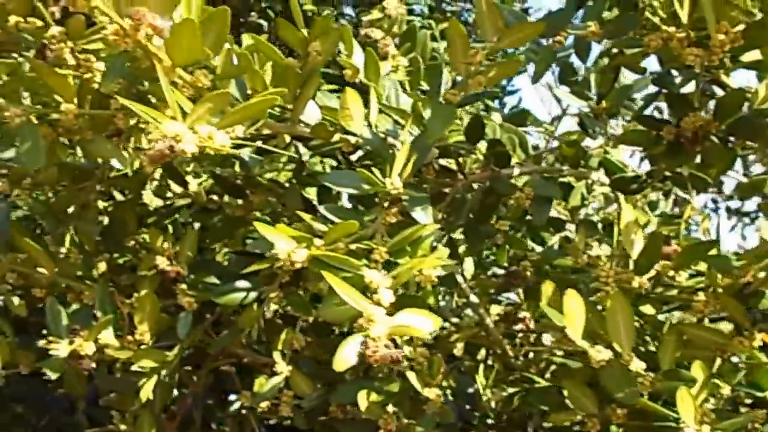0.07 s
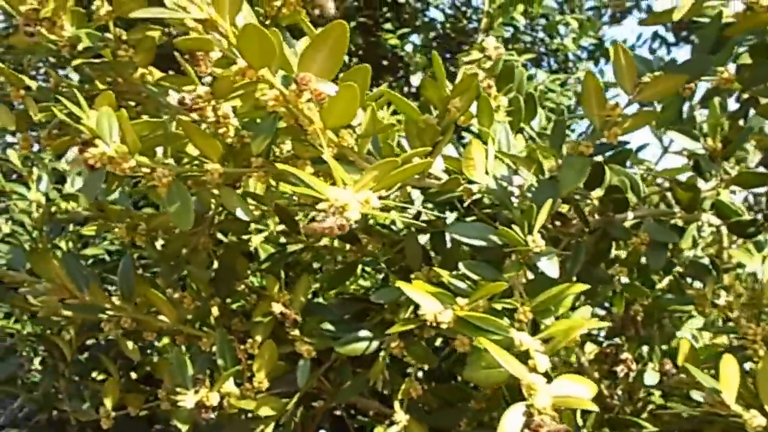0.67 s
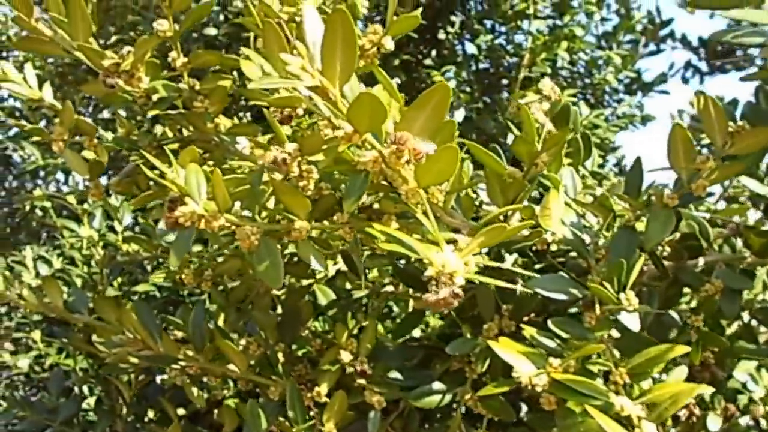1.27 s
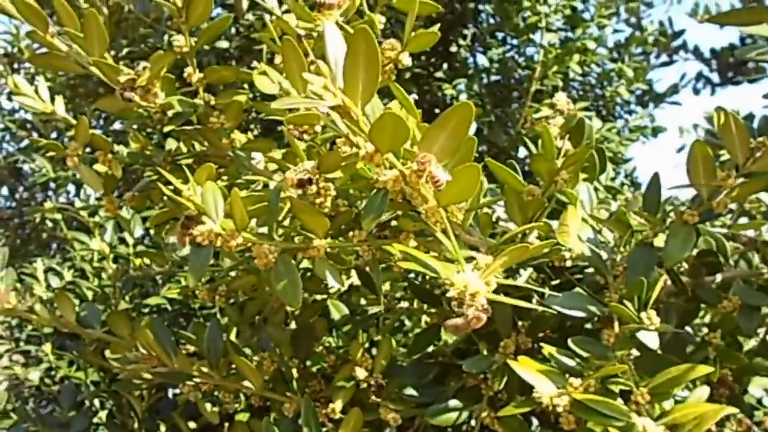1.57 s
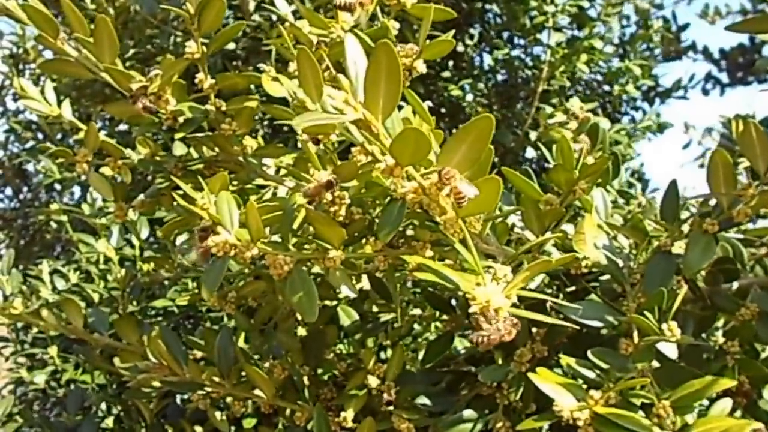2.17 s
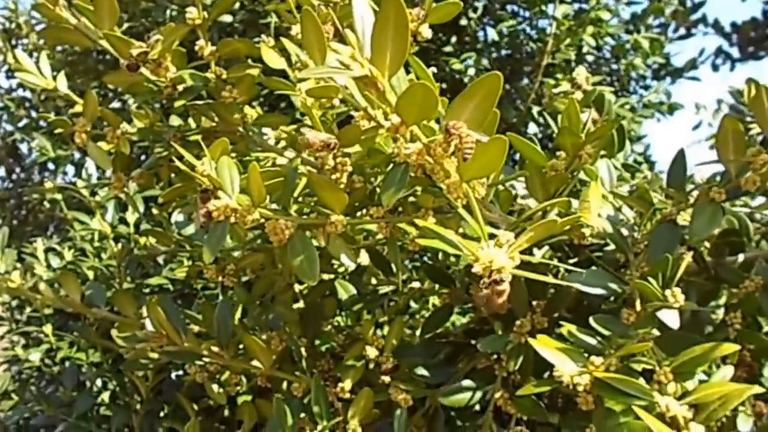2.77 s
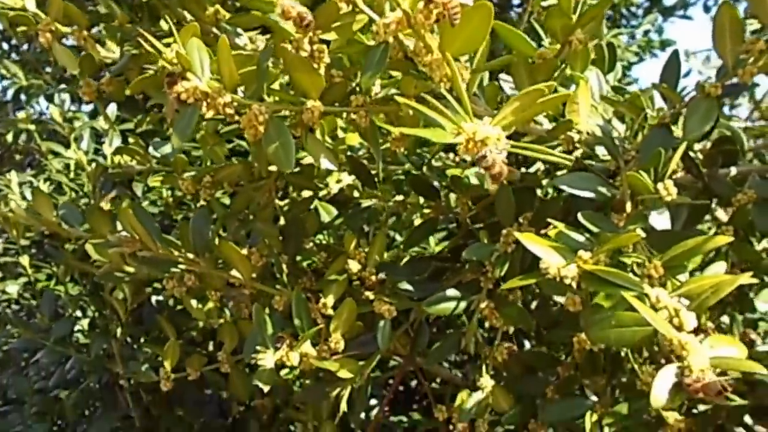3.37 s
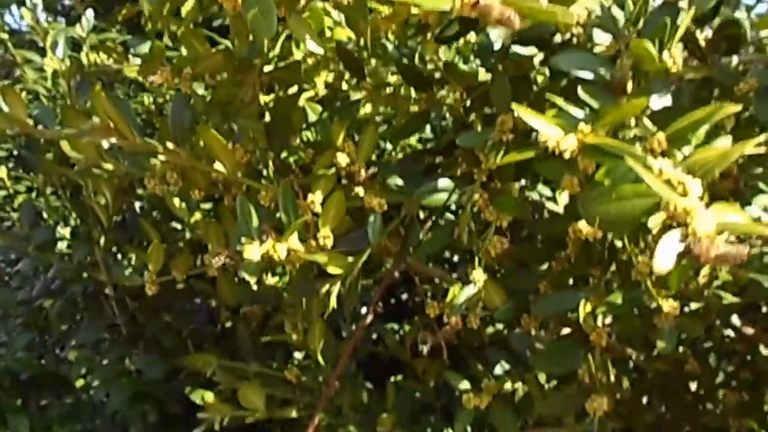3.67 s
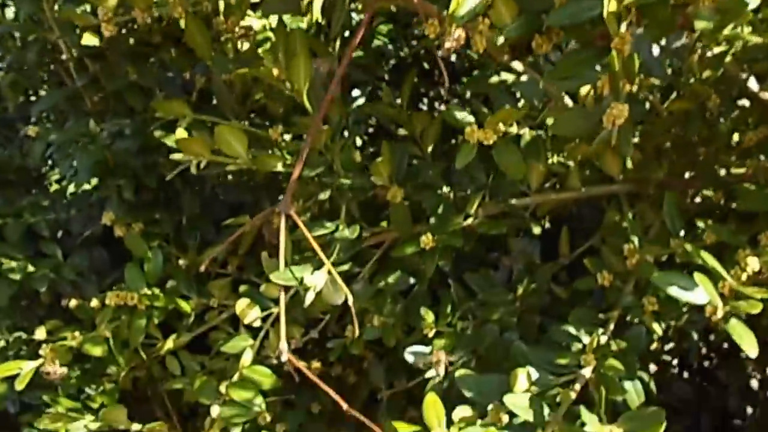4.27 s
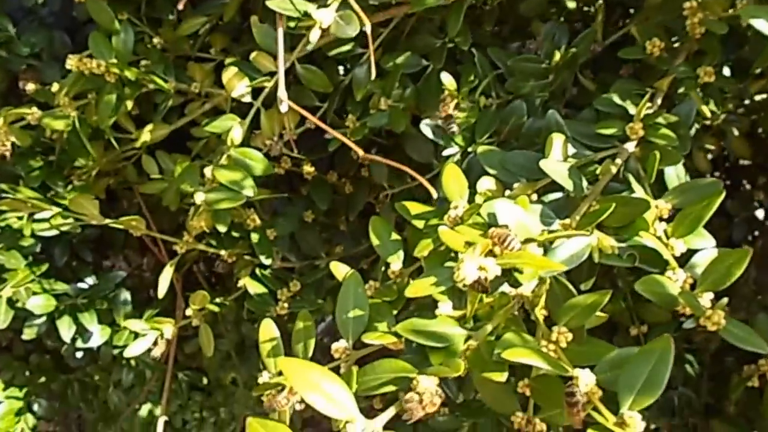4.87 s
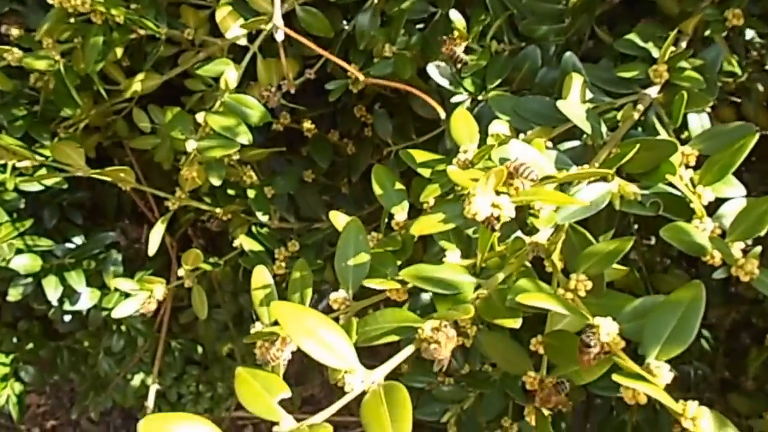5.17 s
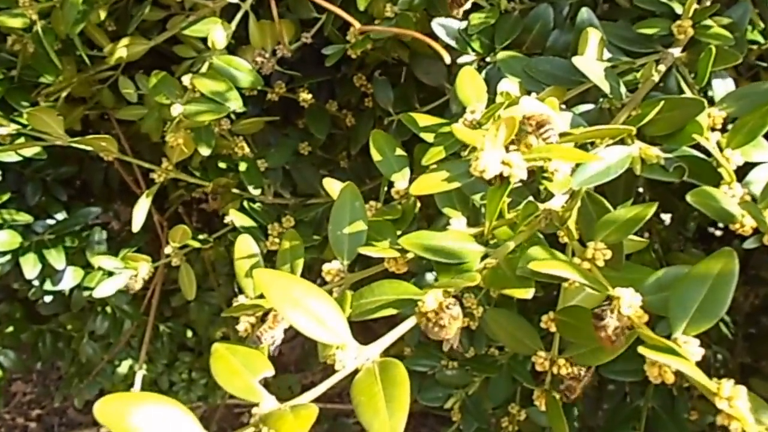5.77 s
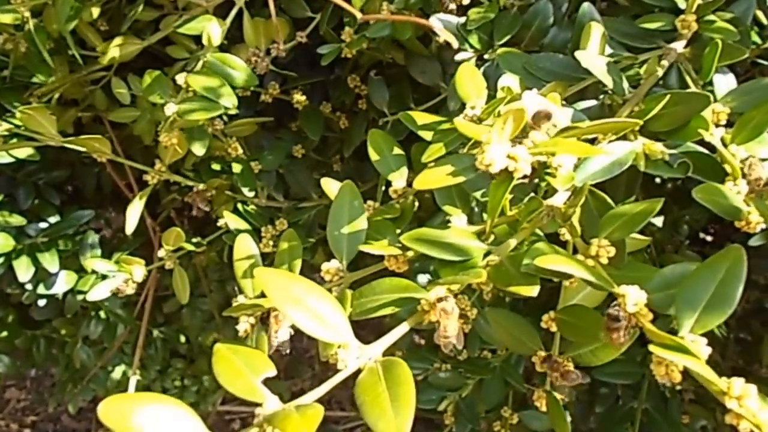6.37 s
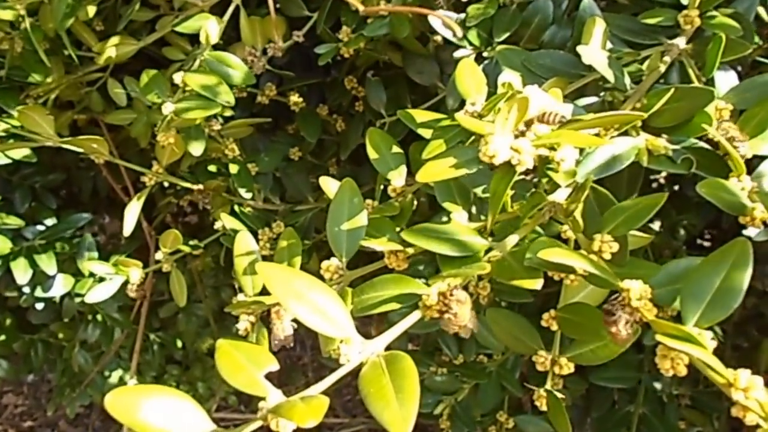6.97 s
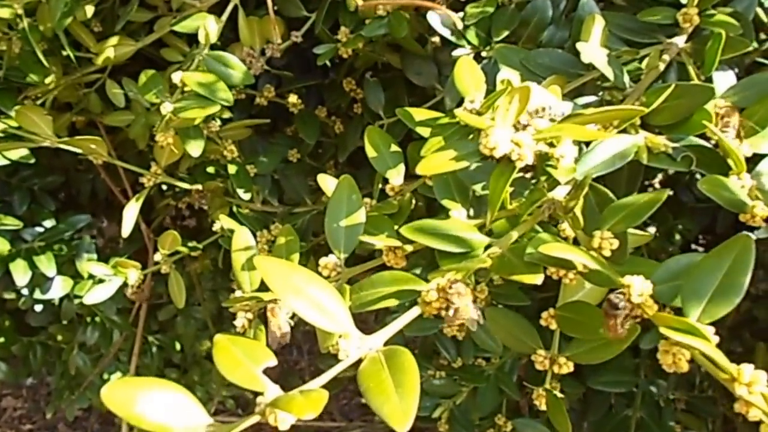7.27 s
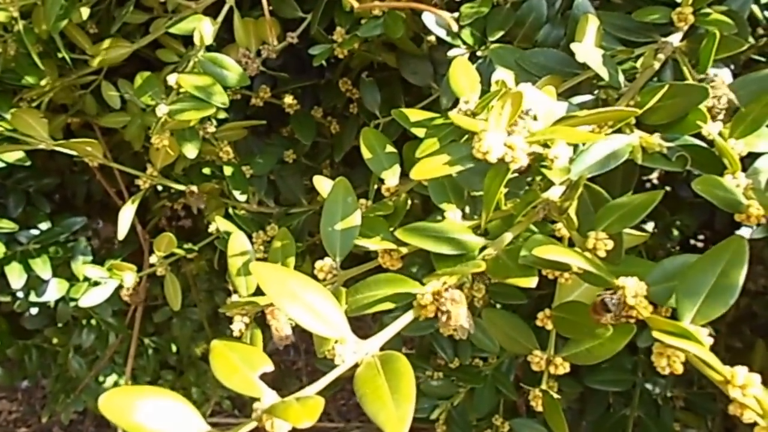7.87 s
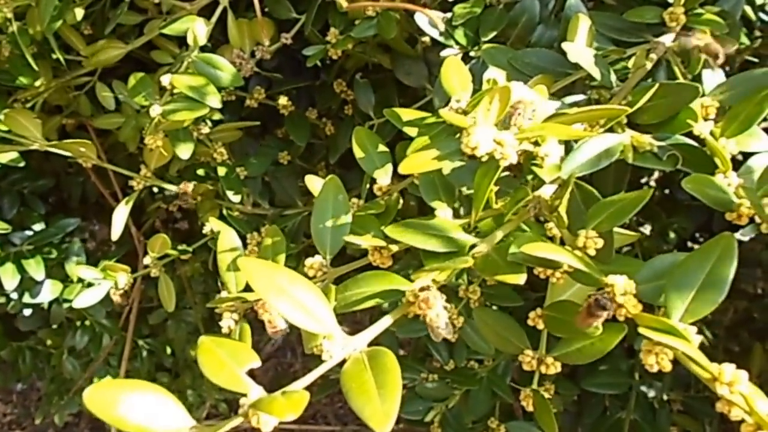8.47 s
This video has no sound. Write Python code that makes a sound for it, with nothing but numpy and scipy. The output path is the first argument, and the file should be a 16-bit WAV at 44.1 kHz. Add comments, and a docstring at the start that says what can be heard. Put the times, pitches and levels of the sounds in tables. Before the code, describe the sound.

Dozens of honeybees work a flowering shrub outdoors, their wings blending into one wavering hum, with single bees swinging close to the microphone. Leaves faintly rustle and tick over a soft rush of air. A bigger, deeper bee hovers by briefly, then the hum grows louder and brighter as the microphone moves to a lower branch. Low puffs of wind and a few faint, distant bird chips sit behind it, and the treble is hollow and fizzy.

```python
"""From the start, dozens of honeybees work a shrub, their wingbeats merging into one hum; single bees
swing close, and leaves rustle and tick over a soft outdoor rush with low puffs of wind. From 2.7 s to
about 4 s a bigger, deeper bee hovers by, and a far bird chips once. Near 4.6 s the microphone sinks to a
lower bough, where the hum is louder and brighter; around 8 s the bird chips three more times.
Throughout, the treble is hollow and fizzy."""
import sys
import numpy as np
from scipy import signal
from scipy.fft import rfft, irfft, next_fast_len
from scipy.io import wavfile
from scipy.ndimage import map_coordinates

SR = 44100
rng = np.random.default_rng(int(sys.argv[2]) if len(sys.argv) > 2 else 0)


def materialize(psi):
    """Save the field psi as 16-bit PCM at rate SR to the path in sys.argv[1].

    A 1-D psi becomes a single channel; in a 2-D psi each row is a channel.
    """
    bounded = np.clip(np.atleast_2d(psi).T, -1, 1)
    quanta = np.round(bounded * 32767).astype(np.int16)
    wavfile.write(sys.argv[1], SR, quanta)


N = 384552
TIME = np.arange(N) / SR

# harmonics of the snap as the wings turn over: (multiple of the wingbeat, relative level/dB)
WING_SNAP = [(1, -18.5), (2, -12), (3, 2.5), (4, -0.5), (5, 2), (6, -3.5), (7, -8.5), (8, -15), (10, -18),
             (13, -17), (20, -37)]


def amp(db):
    """Amplitude ratio of a level in decibels."""
    return 10 ** (np.asarray(db) / 20)


def unit(x):
    """Normalisation to an rms of 1."""
    return x / np.sqrt(np.mean(x ** 2) + 1e-20)


def along(points, hz):
    """Interpolation on a logarithmic frequency axis."""
    f, level = np.transpose(points)
    return np.interp(np.log(hz + 1e-6), np.log(f), level)


def wobble(rate):
    """Slow random modulation: a spline through `rate` knots a second."""
    coarse = np.linspace(0, TIME[-1], 2048)
    knots = rng.standard_normal(2048)
    return np.interp(TIME, coarse, map_coordinates(knots, [coarse * rate], mode="mirror"))


def filtered(x, response):
    """Linear filtering: the spectrum of x times a frequency response."""
    size = next_fast_len(N + SR // 2)
    return irfft(rfft(x, size) * response(np.fft.rfftfreq(size, 1 / SR)), size)[:N]


def coloured(x, spectrum):
    """Spectral shaping by a table of (f/Hz, level/dB)."""
    return filtered(x, lambda hz: amp(along(spectrum, hz)))


def swell(offset_db, growth):
    """Common modulation: a layer lies offset_db over the swarm's mean and follows `growth` dB per dB."""
    # the swarm's loudness as the microphone moves along the shrub: (t/s, level/dB)
    swarm_levels = [(0.0, -43.5), (0.6, -50.0), (0.8, -43.5), (1.1, -46.0), (1.7, -42.5), (2.05, -45.0),
                    (2.4, -51), (2.8, -52), (3.05, -41.5), (3.5, -40.0), (4.15, -46.5), (4.95, -38.0),
                    (6.1, -40.5), (6.48, -43.5), (7.0, -38), (7.7, -36.5), (8.05, -38), (8.72, -38.0)]
    level_db = np.interp(TIME, *np.transpose(swarm_levels))
    return amp(level_db.mean() + offset_db + growth * (level_db - level_db.mean()))


def wing_snap(cycles, scatter_db=0, size=4096):
    """Fourier synthesis: a periodic snap is a harmonic series, here with each bee's own phases."""
    orders = np.arange(1, round(WING_SNAP[-1][0]) + 1)
    strengths = amp(along(WING_SNAP, orders) + scatter_db * rng.standard_normal(len(orders)))
    phasors = np.exp(2j * np.pi * rng.random(len(orders)))
    period = unit(irfft(np.append(0, strengths * phasors), size))
    return period[(cycles * size).astype(int) % size]


def swarm(beat_hz, spread, wander, flutter, roam_db, count=30):
    """Incoherent addition: each bee's wingbeat wavers as it steers, its level as it nears and recedes."""
    tone, octave, rasp = np.zeros((3, N))
    for rank in np.linspace(-1, 1, count):
        detune = spread * np.arcsin(rank * np.sqrt(3) / 2)  # most bees beat near the middle rate
        hz = beat_hz * (1 + detune + wander * wobble(5) + flutter * wobble(28))
        cycles = rng.random() + np.cumsum(hz) / SR
        nearness = amp(roam_db * wobble(3))
        stroke = np.sin(2 * np.pi * cycles)
        tone += nearness * stroke
        octave += nearness * (2 * stroke ** 2 - 1)  # lift peaks on both the up and the down stroke
        rasp += nearness * wing_snap(cycles, scatter_db=1.0)
    return unit(tone), unit(octave), unit(rasp)


def hum_at_boughs(tone, octave, rasp, sink_at_s, sink_s, octave_lift_db):
    """Timbre depends on position in a sound field: by the lower bough, octave and rasp stand out."""
    # brightening of the rasp by the lower bough: (f/Hz, gain/dB)
    bough_colour = [(700, -1), (900, -1.3), (1150, 0.5), (1600, 3), (2100, 0), (3000, -2.5)]
    lowered = (1 + np.tanh((TIME - sink_at_s) / sink_s)) / 2  # 0 at the upper bough, 1 at the lower
    octave = amp(octave_lift_db * lowered) * octave
    rasp = (1 - lowered) * rasp + lowered * coloured(rasp, bough_colour)
    return swell(-4.4, growth=0.85) * tone + swell(-1.3, growth=0.83) * octave + swell(-1.78, 1) * rasp


def wing_draught():
    """Vortex shedding: the eddies from all the wings make broadband noise."""
    # spectrum of the eddies: (f/Hz, relative density/dB)
    eddy_spectrum = [(600, -24), (1400, 4), (1900, -3), (2800, -0.5), (4000, -8.5), (6000, -5),
                     (10000, -20.5)]
    return swell(-11, growth=1) * unit(coloured(rng.standard_normal(N), eddy_spectrum))


def passing_bees(flutter):
    """Inverse-distance law: a near bee rises out of the hum, its pitch gliding as it passes."""
    # closest approaches: (t/s, tone/dB, octave/dB, snap/dB, wingbeat f/Hz, glide/(Hz/s), half-length/s)
    approaches = [(0.055, -46, -46, -53, 216.6, -3, 0.092), (1.392, -47, -48, -54, 231.8, -20.5, 0.073),
                  (3.282, -49, -54, -39.5, 245.5, 129.5, 0.031), (3.334, -51, -48, -43, 205.6, 89.5, 0.044),
                  (4.004, -42.5, -49, -46, 221.3, 0, 0.036), (4.66, -39, -45, -45, 224, -3, 0.05),
                  (5.2, -49, -39.5, -52, 227.4, -9.5, .13), (5.46, -46.5, -37.5, -46.5, 234, 1, 0.066),
                  (5.922, -52, -36, -48, 226.6, 0, 0.035), (6.156, -51, -37, -45.5, 228.3, 9.5, .12),
                  (7.04, -37, -50, -46, 222, 0, 0.12), (7.316, -41, -34.5, -41.5, 233.9, -20, .1),
                  (7.549, -38, -39, -40, 197.8, 100, 0.062), (7.689, -43.5, -41, -42, 203, 50.5, 0.062),
                  (7.852, -43.5, -36.5, -41.5, 220, -50, 0.088), (8.308, -53, -33, -42.5, 225.2, 7, 0.081)]
    out = np.zeros(N)
    for s, tone_db, octave_db, snap_db, hz, glide, half in approaches:
        t = TIME - s
        bend_hz = 2 * half * glide * np.tanh(t / (2 * half))
        cycles = np.cumsum(hz * (1 + flutter * wobble(25)) + bend_hz) / SR
        nearness = np.exp(-np.abs(t) / (4 * half)) / np.hypot(1, t / half)  # foliage soon screens it
        stroke = amp(tone_db) * np.sin(2 * np.pi * cycles) + amp(octave_db) * np.sin(4 * np.pi * cycles)
        out += nearness * (np.sqrt(2) * stroke + amp(snap_db) * wing_snap(cycles))
    return out


def big_bee(flutter, rasp_db, takeoff_s, settle_s, sag_hz_per_s):
    """Slow, broad wings radiate mainly low harmonics; the overtones go as effort squared and fade first."""
    # short flights: (start t/s, hold/s, wingbeat f/Hz, fundamental level/dB, octave level/dB)
    flights = [(2.66, 0.31, 174, -57.5, -58), (2.955, 0.18, 168.5, -36, -39.5), (3.5, 0.11, 178, -51, -45),
               (3.74, .22, 176, -54.5, -51)]
    out = np.zeros(N)
    for s, held, hz, tone_db, octave_db in flights:
        t = np.maximum(TIME - s, 0)
        settling = np.exp(-(np.maximum(t - held, 0) / settle_s) ** 1.3)
        effort = np.minimum(t / takeoff_s, 1) * settling
        cycles = np.cumsum(hz * (1 + flutter * wobble(30)) - sag_hz_per_s * t) / SR
        tone = amp(tone_db) * effort * np.sin(2 * np.pi * cycles)
        overtones = np.sin(4 * np.pi * cycles) + amp(rasp_db) * wing_snap(cycles)
        out += np.sqrt(2) * (tone + amp(octave_db) * effort ** 2 * overtones)
    return out


def leaf_hiss(contacts_per_s, contact_db, flicker_db):
    """Shot noise: tiny random contacts of legs, wings and leaves dot a fine, flickering hiss."""
    # spectrum of the foliage: (f/Hz, relative density/dB)
    hiss_spectrum = [(1000, -40), (2500, -8.5), (5000, 0), (8000, 0.5), (12000, -1)]
    contacts = (rng.random(N) < contacts_per_s / SR) * rng.standard_normal(N)
    hiss = rng.standard_normal(N) * amp(flicker_db * wobble(30))
    return swell(-7, growth=0.88) * unit(coloured(hiss + amp(contact_db) * unit(contacts), hiss_spectrum))


def leaf_rustles(slips_per_s, slip_db):
    """Sliding friction: each brush of leaves swells and fades, a spray of tiny slips over a hiss."""
    # leaves brushing each other, and a longer swish from about 2.9 s to 3.7 s: (start t/s, length/s, peak
    # level/dB)
    brushes = [(0.727, 0.042, -52), (1.413, 0.069, -48.5), (1.608, .14, -48), (1.804, 0.22, -49.5),
               (2.87, .16, -53), (3.177, 0.48, -47.5), (3.922, 0.17, -51), (4.19, .18, -50),
               (4.68, 0.13, -47), (4.833, 0.17, -42.5), (5.433, .26, -51), (7.865, 0.19, -44)]
    # spectrum of sliding leaves: (f/Hz, relative density/dB)
    friction_spectrum = [(1500, -30), (3000, -8), (4200, -2), (7500, -0.5), (10000, -0.5), (12000, -1.5)]
    envelope = np.zeros(N)
    for s, length, db in brushes:
        progress = np.clip((TIME - s) / length, 0, 1)
        envelope += amp(db) * 2 * np.sqrt(progress * (1 - progress))
    slips = (rng.random(N) < slips_per_s / SR) * rng.standard_normal(N)
    friction = rng.standard_normal(N) + amp(slip_db) * unit(slips)
    return envelope * unit(coloured(friction, friction_spectrum))


def leaf_ticks(snap_t60, scrape_t60, scrape_db):
    """Impulsive excitation: a stiff leaf snaps free, jolts its twig and scrapes over its neighbour."""
    # leaves springing free: (t/s, leaf drive level/dB, twig drive level/dB)
    releases = [(.753, -38, -47), (1.451, -38, -46), (1.626, -35, -50), (1.843, -41, -50),
                (2.357, -43, -45), (3.453, -36, -46), (4.195, -40, -54), (4.501, -38, -52),
                (4.706, -32.5, -61), (4.724, -36, -30), (4.872, -36, -44), (4.918, -39, -34),
                (5.308, -31, -38), (5.476, -34, -40), (5.541, -36, -31), (5.549, -24.5, -34),
                (5.696, -31, -50.5), (6.064, -33, -35), (6.688, -31.5, -40), (7.624, -32, -48),
                (7.894, -32.5, -42)]
    # treble response of a leaf: (f/Hz, gain/dB)
    leaf_response = [(2000, -38), (5000, -4), (7500, 0.5), (10000, 0), (12000, 3.5)]
    # lower response of a twig: (f/Hz, gain/dB)
    twig_response = [(1000, -40), (2500, -1.5), (4500, 4.5), (7000, -6), (10000, -34)]
    force = np.zeros((2, N + SR))
    t = np.arange(SR // 4) / SR
    decay = amp(-60 * t / snap_t60) + amp(scrape_db - 60 * t / scrape_t60)
    for s, leaf_db, twig_db in releases:
        start = round(s * SR)
        force[:, start:start + len(t)] += amp([[leaf_db], [twig_db]]) * decay
    leaf, twig = force[:, :N] * rng.standard_normal((2, N))
    return coloured(leaf, leaf_response) + coloured(twig, twig_response)


def far_bird(half_length_s, echo_t60, echo_db):
    """Reverberation by scattering: the trees give each short whistle a decaying tail."""
    # whistled chips: (t/s, level/dB, f/Hz, glide/(Hz/s))
    chips = [(3.22, -55, 4030, 0), (7.913, -52, 4150, -5000), (8.118, -48, 3680, 30000),
             (8.175, -58, 3900, -4)]
    direct = np.zeros(N)
    for s, db, hz, glide in chips:
        t = TIME - s
        envelope = amp(db) * np.exp(-(t / half_length_s) ** 2)
        direct += envelope * np.sin(2 * np.pi * t * (hz + glide * t / 2))
    t = np.arange(SR // 2) / SR
    trees = rng.standard_normal(len(t)) * amp(-60 * t / echo_t60)
    return direct + amp(echo_db) * signal.fftconvolve(direct, trees / np.linalg.norm(trees))[:N]


def breeze():
    """Turbulence: a soft outdoor rush, and low puffs where the moving air reaches the microphone."""
    # spectrum of the rush: (f/Hz, relative density/dB)
    rush_spectrum = [(5, -21), (25, -5), (70, -2.5), (110, 0), (300, -1), (540, -3), (820, -3), (1200, -6),
                     (1900, -25), (4000, -29.5), (8000, -69)]
    # puffs of wind: (t/s, half-length/s, peak level/dB)
    puffs = [(1.65, .22, -57), (3.52, .08, -57), (5.15, .17, -53), (5.7, .12, -50), (7.85, 0.33, -50.5)]
    # rumble of a puff: (f/Hz, relative density/dB)
    puff_spectrum = [(8, -9), (30, -3), (60, 1), (110, -14), (250, -35), (1000, -80)]
    rush = swell(-1.7, growth=0.77) * unit(coloured(rng.standard_normal(N), rush_spectrum))
    gusts = sum(amp(db) * np.exp(-((TIME - s) / half) ** 2 / 2) for s, half, db in puffs)
    return rush + gusts * unit(coloured(rng.standard_normal(N), puff_spectrum))


def scene():
    """Superposition: the pressures from bees, foliage, bird and air add at one microphone."""
    tone, octave, rasp = swarm(beat_hz=224.04, spread=0.072, wander=0.035, flutter=0.016, roam_db=3)
    bees = hum_at_boughs(tone, octave, rasp, sink_at_s=4.57, sink_s=0.24, octave_lift_db=4.5)
    bees += wing_draught() + passing_bees(flutter=0.005)
    bees += big_bee(flutter=0.00403, rasp_db=-11.5, takeoff_s=0.045, settle_s=0.17, sag_hz_per_s=12.3)
    foliage = leaf_hiss(contacts_per_s=220, contact_db=-6.5, flicker_db=1.33)
    foliage += leaf_rustles(slips_per_s=500, slip_db=8.5)
    foliage += leaf_ticks(snap_t60=0.016, scrape_t60=0.041, scrape_db=-16.5)
    bird = far_bird(half_length_s=0.021, echo_t60=0.44, echo_db=-2)
    return (bees + foliage + bird + breeze())[None]


def record(dry, notch_hz=5520, top_hz=11800):
    """Interference: two paths in the housing cancel at one pitch; a resonance near 10 kHz adds fizz."""
    # treble colour, a resonance near 10 kHz, a narrow dip at 11 kHz, faint fizz above: (f/Hz, gain/dB)
    treble_colour = [(3000, 0), (4000, 0), (6000, -5.5), (7000, -2), (8000, 1.5), (9000, 6), (10000, 11.5),
                     (10550, 11), (10850, 2.5), (11050, -10.5), (11350, -5), (11750, -26)]

    def response(hz):
        two_paths = np.abs(np.cos(np.pi / 2 * hz / notch_hz))
        return two_paths * amp(along(treble_colour, hz)) * (hz < top_hz)

    return filtered(dry[0], response)[None]


dry = scene()
out = record(dry)
materialize(out)
```